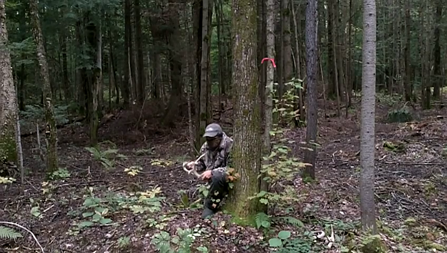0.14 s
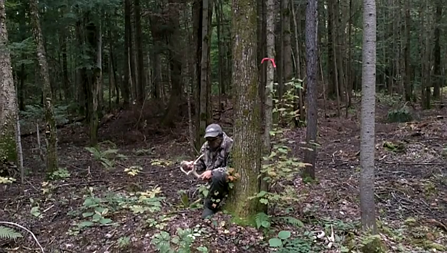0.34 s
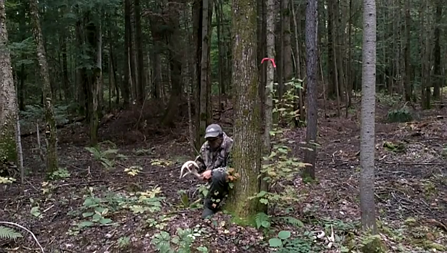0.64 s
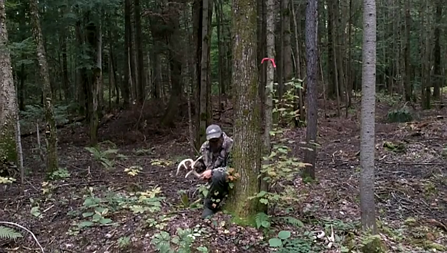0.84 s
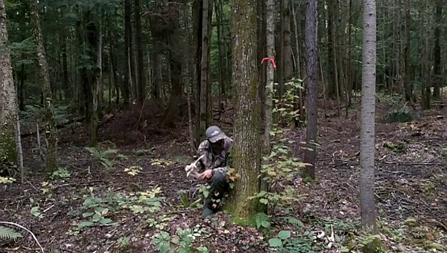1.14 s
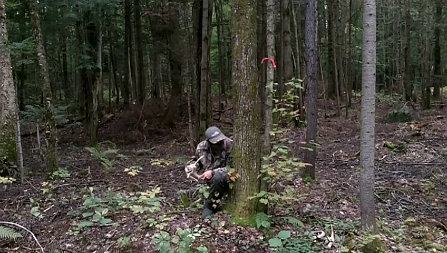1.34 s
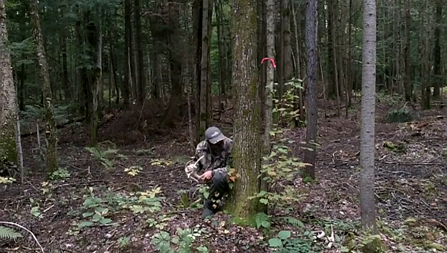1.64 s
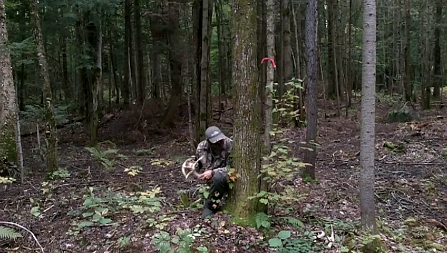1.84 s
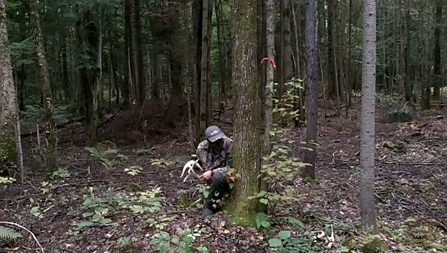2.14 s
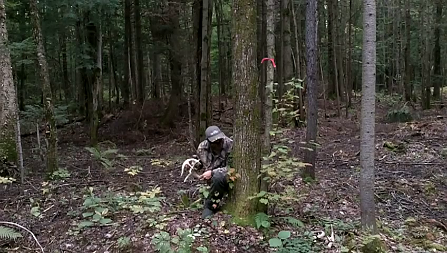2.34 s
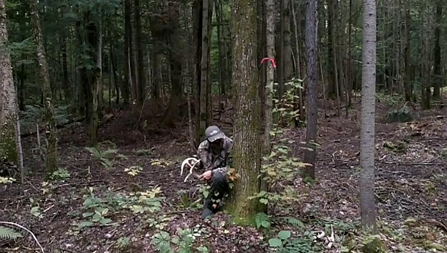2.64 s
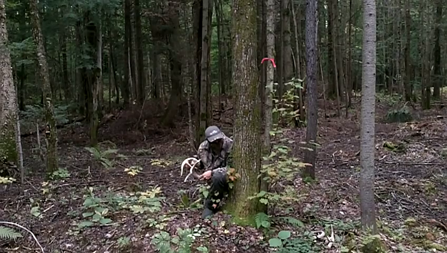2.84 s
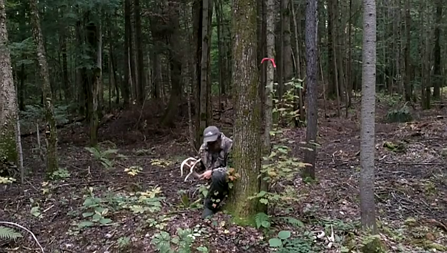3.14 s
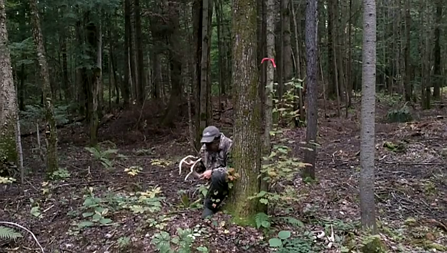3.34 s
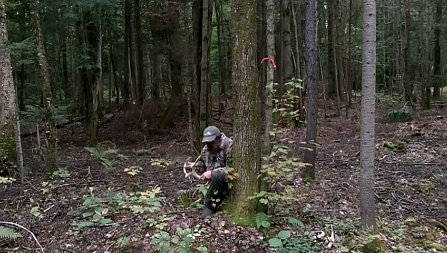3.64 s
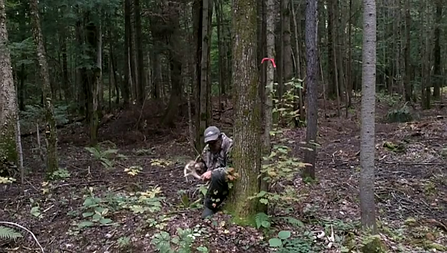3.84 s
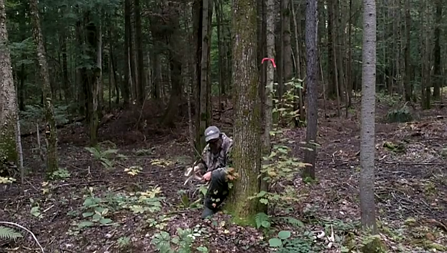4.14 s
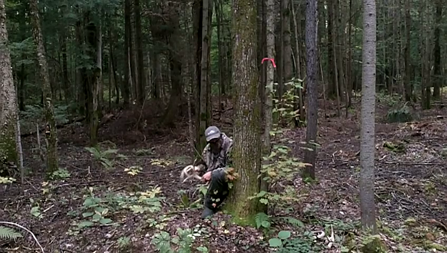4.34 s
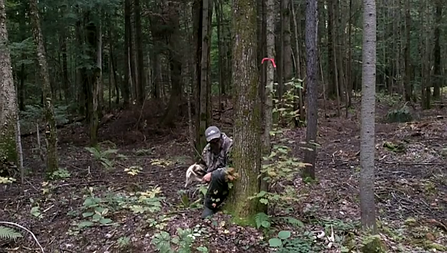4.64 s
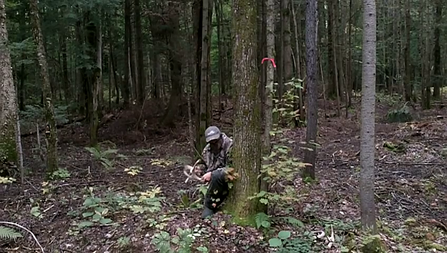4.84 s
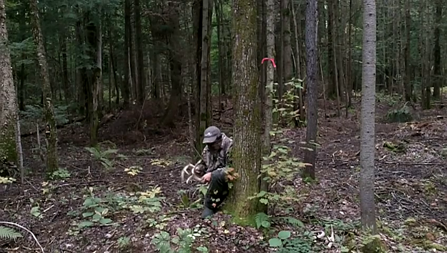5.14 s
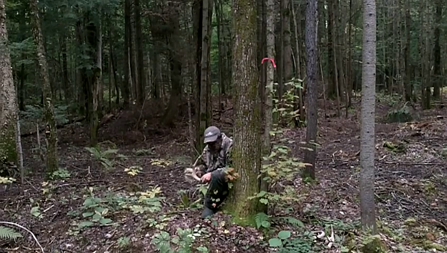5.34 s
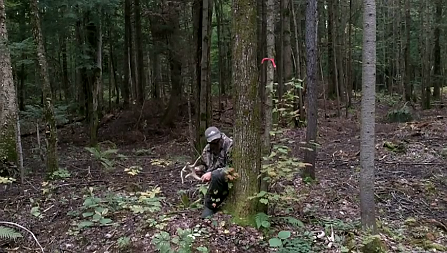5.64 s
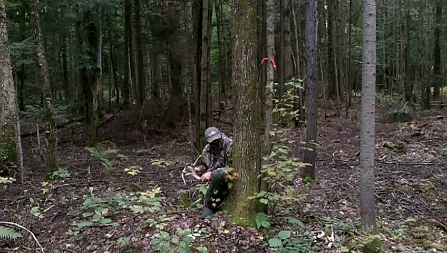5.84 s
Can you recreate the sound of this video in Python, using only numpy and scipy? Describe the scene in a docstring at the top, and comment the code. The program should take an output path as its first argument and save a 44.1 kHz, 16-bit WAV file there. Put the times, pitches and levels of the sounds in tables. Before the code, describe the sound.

Hard antlers rattle outdoors: faint ticks first, then firm clacks in small bursts, a pause of over a second in the middle, and a denser series of cracks, knocks and short skids toward the end. Each hit is brief and woody-bony with a small ringing edge and a scattered woodland tail. The mono microphone also catches quiet hiss and a distant, slowly swelling hum.

```python
"""Two antlers are tapped and ground together in short bursts in a quiet forest.
Each contact skids for a few milliseconds: a tine rings, the bone cracks and snaps, the beams knock.
Random echoes stand for the tree trunks that scatter each contact back.
Below lie a far low drone made of narrow bands of noise, a soft hiss and a gently swelling rumble.
The microphone has four dips and an upper limit."""
import sys
import numpy as np
from scipy import signal
from scipy.fft import rfft, irfft, next_fast_len
from scipy.io import wavfile
from scipy.ndimage import map_coordinates

SR = 44100
rng = np.random.default_rng(int(sys.argv[2]) if len(sys.argv) > 2 else 0)


def unload_wav(signal):
    """Save mono or channel-first audio to the path in sys.argv[1] as 16-bit WAV at rate SR, clipped to [-1, 1]."""
    wavfile.write(
        sys.argv[1],
        SR,
        np.round(np.clip(np.atleast_2d(signal).T, -1, 1) * 32767).astype(np.int16),
    )


N = 263718  # length of the scene [samples]

# Touches of bone on bone; the three levels are settings that a fixed trim later shifts:
# (time [s], level [dB], beam knock [dB], snap [dB], tine pitch [Hz], beam pitch [Hz], skid [s])
CONTACTS = [(0.0852, -34.5, -12, -16.5, 4120, 1870, .0013), (0.0991, -37, -10, -19, 3770, 2350, .0016),
            (0.1078, -31.5, -19, -34, 3590, 1850, 0.001), (0.1145, -37, -8, -23, 3620, 1900, 0.0027),
            (0.6258, -18.5, -13, -19.5, 3300, 1370, 0.0011), (0.6507, -25.5, -12, -34, 3230, 1380, 0.0014),
            (0.6949, -25, -9, -18.5, 4610, 2240, 0.0039), (0.702, -28, -9, -37, 3350, 1900, .0015),
            (1.0292, -36.5, -6, -27, 3100, 1890, 0.0015), (1.0625, -39.5, -5.5, -21, 3630, 1870, 0.003),
            (1.0853, -42, -11, -18, 3200, 1220, .002), (1.1229, -16, -9, -17, 3420, 2330, 0.00068),
            (1.154, -32, -4, -25, 4260, 1970, 0.0035), (1.165, -23.5, -7.5, -19.5, 3300, 1570, 0.0022),
            (2.138, -28.5, -8, -16, 4420, 2200, 0.00077), (2.167, -37.5, -2, -31, 3600, 2310, 0.0011),
            (2.1924, -39, 3, -20, 4310, 840, 0.0018), (2.2144, -40.5, -5.5, -23, 4380, 880, 0.0017),
            (2.2901, -42, -3.5, -28, 3300, 885, .0015), (3.5865, -32, -4.5, -10.5, 3650, 1730, 0.0014),
            (3.6086, -33, -5, -7.5, 4020, 2400, 0.0017), (3.6218, -20.5, -11, -14.5, 4044, 1720, 0.0038),
            (3.6366, -30, -4.5, -11, 4010, 2340, 0.0021), (3.6493, -32.5, -9, -22, 3060, 2030, 0.00085),
            (3.661, -37, -8, -25, 4130, 2300, .002), (4.023, -19.5, -11, -19.5, 4640, 1430, 0.0016),
            (4.0428, -31, -2, -18, 4440, 1390, 0.00095), (4.0898, -36, -3.5, -27, 3440, 1530, .001),
            (4.163, -35, -6.5, -14.5, 3220, 1690, .0011), (4.18, -24.5, -11.5, -15, 4160, 1810, .0014),
            (4.3645, -34, 2.5, -18, 4420, 2060, 0.0027), (4.3762, -15, -15.5, -20.5, 3520, 1610, 0.0028),
            (4.4004, -20.5, -18, -24, 3460, 1570, 0.0048), (4.425, -33, -10, -21, 3380, 2160, .0022),
            (4.595, -38, -12, -25, 3100, 1460, .0013), (4.605, -25, -9.5, -10, 3810, 1110, 0.002),
            (4.743, -25.5, -6, -17, 4520, 1700, 0.0019), (4.777, -33.5, -7.5, -31, 3400, 1670, 0.0022),
            (4.805, -38.5, -0.5, -20, 3480, 860, 0.00093), (4.989, -30.5, -5.5, -23.5, 3310, 1200, 0.0033),
            (5.033, -44.5, 3, -22, 3760, 1210, .004), (5.3148, -25, -10, -17.5, 4030, 1630, 0.0024),
            (5.3523, -31.5, -9, -20, 3270, 1420, 0.0022), (5.364, -36.5, -8.5, -24, 4380, 1120, .0024),
            (5.399, -23.5, -5.5, -20, 3516, 1230, 0.0024), (5.5855, -46, -3, -11, 4250, 1430, .0021)]
# Ways the tines can ring, with the time to fade by 60 dB: (pitch [Hz], relative level [dB], fade [s])
TINE_MODES = [(3290, 7.5, 0.033), (3462, -3, 0.026), (3920, -1, 0.04), (4220, -4.5, 0.048),
              (4980, -2, 0.048), (4984, -4, 0.056)]
# Ways the heavy beams can ring: (pitch [Hz], relative level [dB], fade by 60 dB [s])
BEAM_MODES = [(404, -21, 0.11), (857.4, -5.5, 0.13), (1198, -5.5, 0.14), (1290, -11.5, 0.17),
              (1450, -1, 0.047), (1678, 6, 0.044), (1919, 1.5, 0.068), (2070, -2, 0.084),
              (2090, 7.5, 0.053), (2244, 0, 0.11)]
# Colour of the noise in a beam knock: (frequency [Hz], relative level [dB])
KNOCK_COLOUR = [(100, -51), (400, -11.5), (700, -16), (1300, -2), (2000, -1), (2500, 5.5), (2900, -16),
                (4500, -96)]
# Colour of the cracking bone: (frequency [Hz], relative level [dB])
CRACK_COLOUR = [(1200, -70.5), (2700, 2.5), (3200, 0), (4000, 1.5), (4900, 1), (5300, -8.5), (6000, -41),
                (8000, -71.5)]
# Colour of the bright snap: (frequency [Hz], relative level [dB])
SNAP_COLOUR = [(4000, -60), (5600, 7.5), (6200, 5), (7100, -7), (8000, -17.5), (10000, -14.5), (12000, -24),
               (15500, -35)]
# How long the forest's answer takes to fade: (frequency [Hz], fade by 60 dB [s])
FOREST_FADE = [(300, 0.98), (1500, 0.4), (4000, 0.66), (7000, 0.64), (14000, 0.43)]
# Swelling of the deepest drone tone: (time [s], level [dB])
DEEP_LEVEL = [(0, -67.5), (3.05, -69.5), (3.6, -55.5), (4.9, -70.5), (5.55, -58.5), (5.98, -59)]
# Upper drone tones: (centre [Hz], half-width at half height [Hz], middle level [dB])
UPPER_DRONE = [(119, 7.5, -65), (175, 9.4, -68)]
# Colour of the forest hiss: (frequency [Hz], relative level [dB])
HISS_COLOUR = [(15, -21), (60, -10.5), (200, -3), (500, -5), (1200, -7), (2200, -10), (3500, -6.5),
               (4700, -6), (5400, -14), (6800, -23.5), (8000, -35.5), (10000, -30.5), (12000, -35),
               (15500, -36)]
# Colour of the forest rumble: (frequency [Hz], relative level [dB])
RUMBLE_COLOUR = [(12, 3), (28, 2), (45, 0.5), (60, -3), (110, -4.5), (220, -9.5), (450, -17.5), (1000, -62)]
# Dips of the microphone: (centre [Hz], width [Hz], gain at the centre [dB])
MIC_DIPS = [(2705, 790, -33), (5438, 1090, -32), (7850, 830, -27), (11010, 840, -14)]

# Share of a click that is tine ring rather than crack (0-1), and how pitch and skid change it
SHARE, MIDDLE_TINE_HZ, SHARE_PER_OCTAVE, SHARE_PER_SKID_S = 0.084, 3800, -0.43, 144
FIRM_DB = -27.5  # a contact whose table level is above this is firm
# The light catch after a firm blow: mean gap, loss of level, beam knock, skid
CATCH_GAP_S, CATCH_LOSS_DB, CATCH_KNOCK_DB, CATCH_SKID_S = 0.024, 19.5, -5, 0.001
# The forest's answer: level for a firm crack, gain per dB that a touch is lighter, loss for a pure ring
ECHO_DB, ECHO_PER_DB, RING_DRIER_DB = -10.5, 0.2, 6
# The deepest drone tone (half-width at half height), and the typical drift of the upper tones
DEEP_HZ, DEEP_WIDTH_HZ, DRIFT_DB = 84.4, 4.2, 2.5
HISS_DB, HISS_EXTRA_DB, SETTLE_S = -52.5, 4, 2.9  # settled level, extra at the start, time to settle
RUMBLE_DB, SWELL_DB = -58, 1  # middle level and typical depth of its swells
KNOTS_PER_S = 1.415  # pace of the random curves that move the rumble and the upper drone
TINE_BAND = signal.butter(2, [2400, 6000], "bandpass", fs=SR, output="sos")  # where a struck tine rings
TOP_HZ = 15400  # upper limit of the microphone


def antlers():
    """Each contact has its own echo: light touches sound more diffuse, ringing ones drier."""
    track = np.zeros(N)
    for s, db, knock_db, snap_db, tine_hz, beam_hz, length in CONTACTS + grinding():
        share = tine_share(tine_hz, length)
        hit = amp(db - 1.5) * contact(knock_db, snap_db, tine_hz, beam_hz, share, length)
        lighter_db = max(FIRM_DB - db, 0)
        echo_db = ECHO_DB + ECHO_PER_DB * lighter_db - RING_DRIER_DB * share
        echo = signal.fftconvolve(hit, trunks(scatter_db=0.5, early_db=-14))
        add(track, s, hit)
        add(track, s, amp(echo_db) * echo)
    return track


def grinding():
    """After a firm blow the tines slide on and catch again, more lightly and at another point."""
    firm = [row for row in CONTACTS if row[1] > FIRM_DB]
    rows = []
    for s, db, _, snap_db, *_ in firm:
        wait, tine, beam = rng.random(3)
        catch_s = s + CATCH_GAP_S * (0.5 + wait)
        tine_hz = TINE_MODES[int(tine * len(TINE_MODES))][0]
        beam_hz = BEAM_MODES[int(beam * len(BEAM_MODES))][0]
        rows.append((catch_s, db - CATCH_LOSS_DB, CATCH_KNOCK_DB, snap_db, tine_hz, beam_hz, CATCH_SKID_S))
    return rows


def tine_share(tine_hz, length):
    """Long, low tines ring more than they crack, and a longer skid draws out more ring (0-1)."""
    octaves = np.log2(tine_hz / MIDDLE_TINE_HZ)
    return np.clip(SHARE + SHARE_PER_OCTAVE * octaves + SHARE_PER_SKID_S * length, 0, 1)


def contact(knock_db, snap_db, tine_hz, beam_hz, share, length):
    """One touch of bone on bone: a ringing tine, a crack, a beam knock and a bright snap."""
    t = np.arange(SR // 8) / SR
    # a quick force and a stronger one that fades a little more slowly
    force = skid(t, length, t60=0.023, rise=0.37) + amp(8.0) * skid(t, length, t60=0.028, rise=0.34)
    snap_force = skid(t, length, t60=0.015, rise=0.17)
    # ridges on the bone make the blow gritty: a new random strength every 24 samples
    ridges = amp(3 * np.repeat(rng.standard_normal(len(t)), 24)[:len(t)])

    def hardness(hz):
        """A stronger snap tilts the treble up, a weaker one tilts it down (dB)."""
        return 0.53 * (snap_db + 22.0) * np.log2((hz + 100) / 4000)

    def grit(envelope, colour_db):
        """Coloured noise shaped by the force and the ridges."""
        noise = envelope * ridges * rng.standard_normal(len(t))
        return strike(signal.fftconvolve(noise, causal(colour_db))[:len(t)])

    knock = grit(force, lambda hz: along(KNOCK_COLOUR, hz) + focus(hz, beam_hz))
    crack = grit(force, lambda hz: along(CRACK_COLOUR, hz) + hardness(hz))
    snap = grit(snap_force, lambda hz: along(SNAP_COLOUR, hz) + hardness(hz))
    # the touch damps the struck tine, and its pressure blurs the pitch (phase drift in radians)
    jitter = signal.fftconvolve(rng.standard_normal(len(t)), np.hanning(61) / 30, "same")
    drift = 0.075 * np.cumsum(jitter)
    tine = force * np.sin(2 * np.pi * (tine_hz * t + rng.random()) + drift)
    tine = strike(signal.sosfilt(TINE_BAND, tine))
    click = strike(np.sqrt(share) * tine + np.sqrt(1 - share) * crack)
    # the rest of the bone rings freely, mostly for longer
    free_tines = ring(TINE_MODES, lambda hz: focus(hz, tine_hz, lift_db=15.5, octaves=0.19), t)
    beams = ring(BEAM_MODES, lambda hz: focus(hz, beam_hz), t)
    body = amp(knock_db) * (amp(-5.5) * beams + amp(-2.0) * knock)
    return click + amp(-9.0) * free_tines + body + amp(snap_db + 2.0) * snap


def skid(t, length, t60, rise):
    """Force rises and holds while the tines skid, then fades by 60 dB every t60 seconds."""
    swell = np.minimum(t / (rise * length + 1e-5), 1)
    return swell * amp(-60 * np.maximum(t - length, 0) / t60)


def focus(hz, centre, lift_db=9, octaves=0.1):
    """The point of contact favours the bone's resonances near one pitch (dB)."""
    return lift_db / (1 + (np.log2((hz + 1) / centre) / octaves) ** 2)


def ring(modes, lift_db, t):
    """Free ringing of bone: fading sine waves, at new strengths and phases for each blow."""
    hz, db, t60 = np.transpose(modes)[:, :, None]
    size = amp(db + lift_db(hz) + rng.normal(0, 1.2, hz.shape))
    waves = size * amp(-60 * t / t60) * np.sin(2 * np.pi * (hz * t + rng.random(hz.shape)))
    soft_start = 1 - np.exp(-t / 0.0012)
    return strike(waves.sum(axis=0) * soft_start)


def trunks(scatter_db, early_db, count=18):
    """The forest's answer: a few single trunk echoes in a grainy, fading tail."""
    hz, t, z = signal.stft(rng.standard_normal(SR * 3 // 4), SR, nperseg=256)
    clumps = amp(scatter_db * rng.standard_normal(len(t)))
    fade = amp(-60 * t / along(FOREST_FADE, hz)[:, None])
    build_up = 1 - np.exp(-t / 0.0071)
    tail = signal.istft(z * clumps * fade * build_up, SR, nperseg=256)[1]
    tail /= np.linalg.norm(tail)
    delays = rng.uniform(0.008, 0.16, count)  # seconds
    strengths = rng.standard_normal(count) * amp(-60 * delays / 0.33)
    echoes = np.bincount((delays * SR).astype(int), strengths, len(tail))
    return tail + amp(early_db) * echoes / np.linalg.norm(echoes)


def drone():
    """Far low tones, each a narrow band of noise, drift in level; the deepest swells twice."""
    def tone(centre, width):
        noise = rng.standard_normal(N)
        return unit(filtered(noise, lambda hz: 1 / (1 + ((hz - centre) / width) ** 2)))

    s, db = np.transpose(DEEP_LEVEL)
    deep_db = np.interp(np.arange(N) / SR, s, db)
    mix = amp(deep_db) * tone(DEEP_HZ, DEEP_WIDTH_HZ)
    for centre, width, middle_db in UPPER_DRONE:
        mix += amp(middle_db + DRIFT_DB * wobble(KNOTS_PER_S)) * tone(centre, width)
    return mix


def air():
    """Coloured noise: a soft hiss that slowly settles, over a gently swelling rumble."""
    def noise(colour):
        return unit(filtered(rng.standard_normal(N), lambda hz: amp(along(colour, hz))))

    unsettled = np.maximum(1 - np.arange(N) / SR / SETTLE_S, 0)
    hiss_db = HISS_DB + HISS_EXTRA_DB * unsettled
    rumble_db = RUMBLE_DB + SWELL_DB * wobble(KNOTS_PER_S)
    return amp(hiss_db) * noise(HISS_COLOUR) + amp(rumble_db) * noise(RUMBLE_COLOUR)


def amp(db):
    """Decibels to gain."""
    return 10 ** (np.asarray(db) / 20)


def unit(x):
    """Scale to an rms (average strength) of 1."""
    return x / np.sqrt(np.mean(x ** 2) + 1e-20)


def strike(x):
    """Scale a hit to rms 1 over its first 9 ms."""
    return x / np.sqrt(np.mean(x[:round(0.009 * SR)] ** 2) + 1e-20)


def along(points, hz):
    """Read a value between (Hz, value) points on a logarithmic frequency axis."""
    f, v = np.transpose(points)
    return np.interp(np.log(hz + 1), np.log(f + 1), v)


def wobble(rate):
    """A smooth random curve through rate random points a second."""
    return map_coordinates(rng.standard_normal(64), [np.arange(N) * rate / SR], mode="wrap")


def filtered(x, response):
    """Change the strength and phase of each frequency in x by a given response."""
    m = next_fast_len(N + SR // 2)
    return irfft(rfft(x, m) * response(np.fft.rfftfreq(m, 1 / SR)), m)[:N]


def causal(colour_db, size=1024):
    """A filter of the given colour (dB over Hz) that answers as early as it can: minimum phase."""
    cepstrum = irfft(np.log(amp(colour_db(np.fft.rfftfreq(size, 1 / SR)))))
    # folding the second half onto the first gives the minimum phase
    cepstrum[1:size // 2] *= 2
    cepstrum[size // 2 + 1:] = 0
    return irfft(np.exp(rfft(cepstrum)))


def add(track, s, sound):
    """Mix a sound into the track at time s, in seconds."""
    start = round(s * SR)
    part = sound[:len(track) - start]
    track[start:start + len(part)] += part


def scene():
    """The antlers over the forest background, as one channel."""
    return (antlers() + drone() + air())[None]


def record(dry):
    """The microphone cuts its dips into everything and keeps nothing from its upper limit on."""
    def response(hz):
        gain = hz < TOP_HZ
        for centre, width, db in MIC_DIPS:
            off_centre = centre * centre - hz * hz
            damping = 1j * hz * width
            gain = gain * (off_centre + damping * amp(db)) / (off_centre + damping)
        return gain

    return filtered(dry[0], response)[None]


dry = scene()
out = record(dry)
unload_wav(out)
```